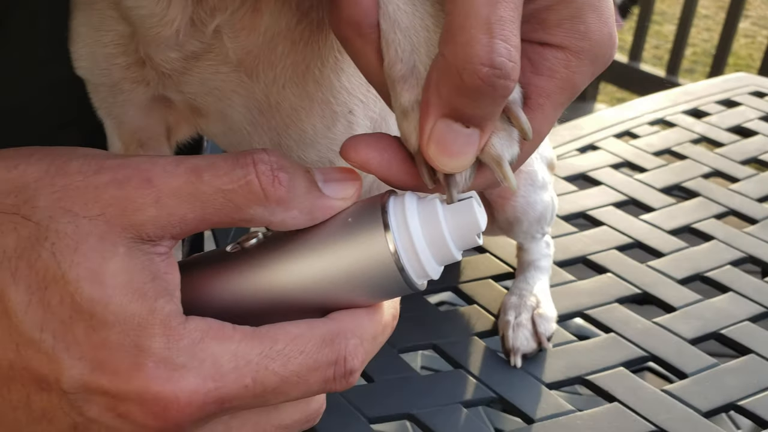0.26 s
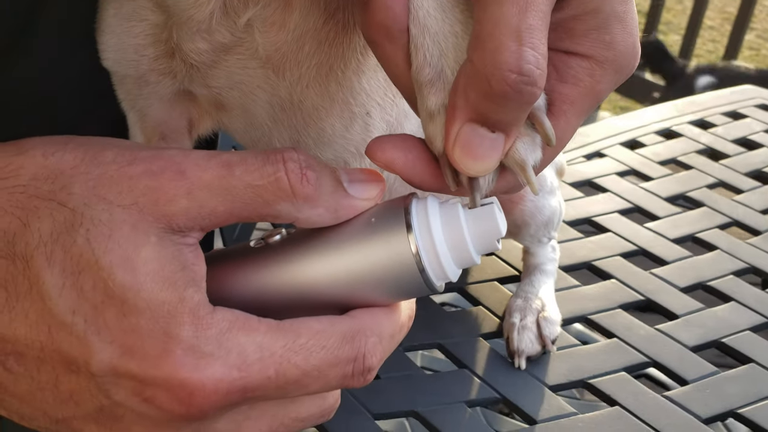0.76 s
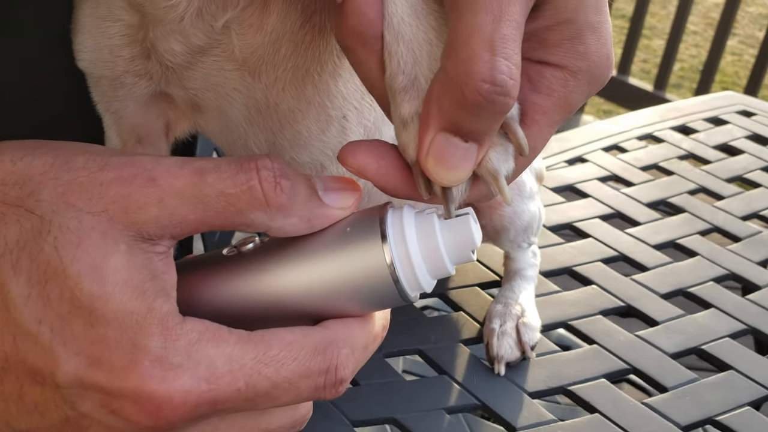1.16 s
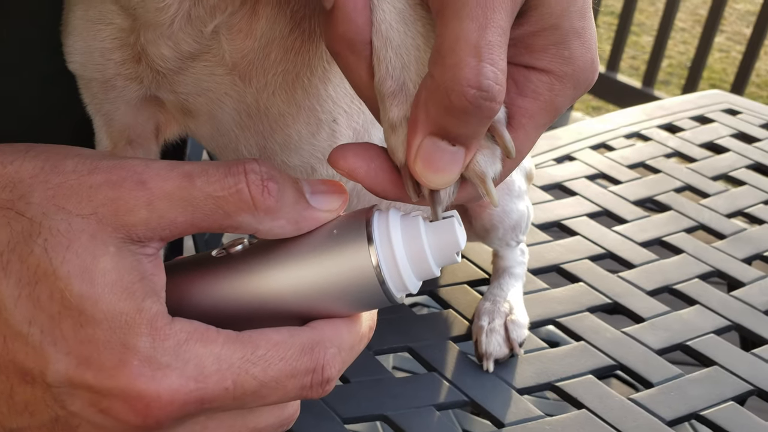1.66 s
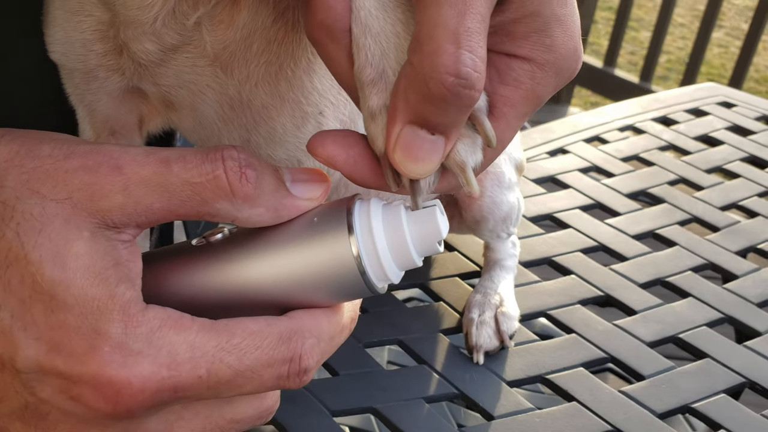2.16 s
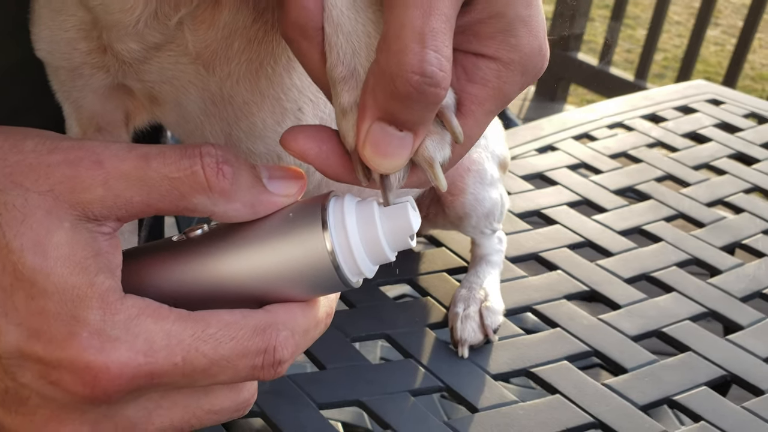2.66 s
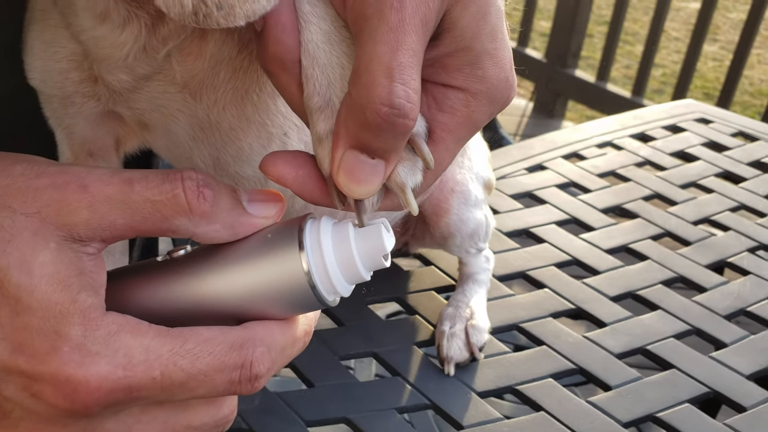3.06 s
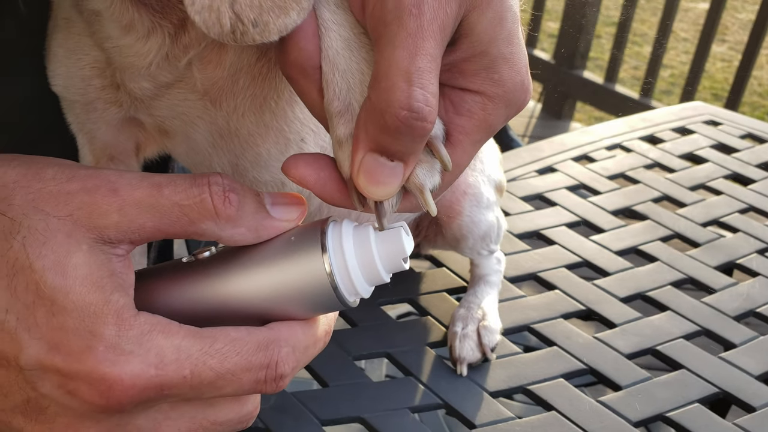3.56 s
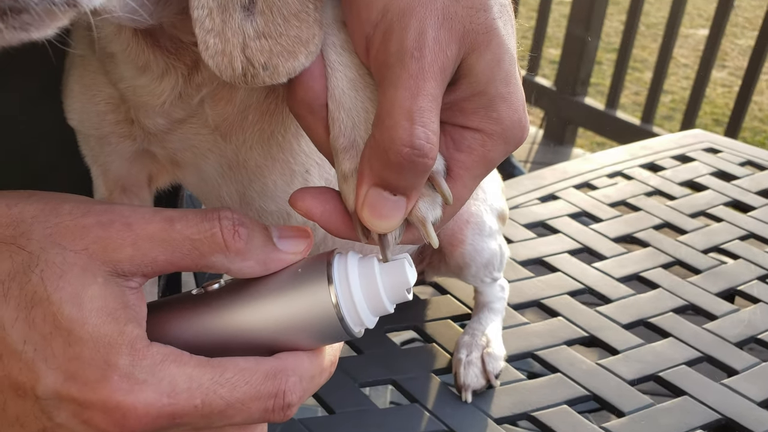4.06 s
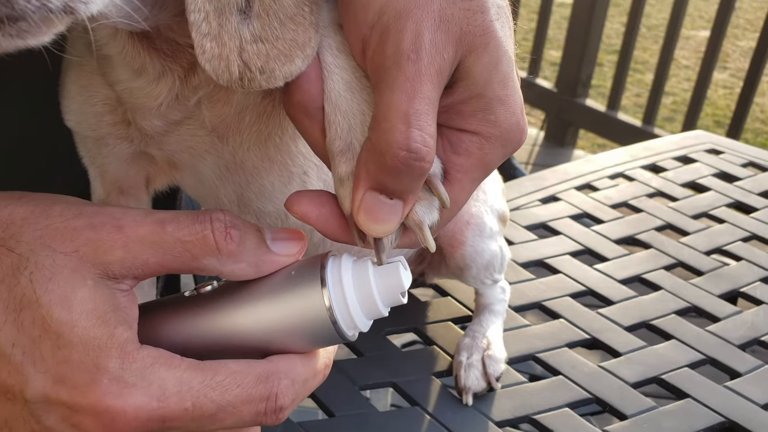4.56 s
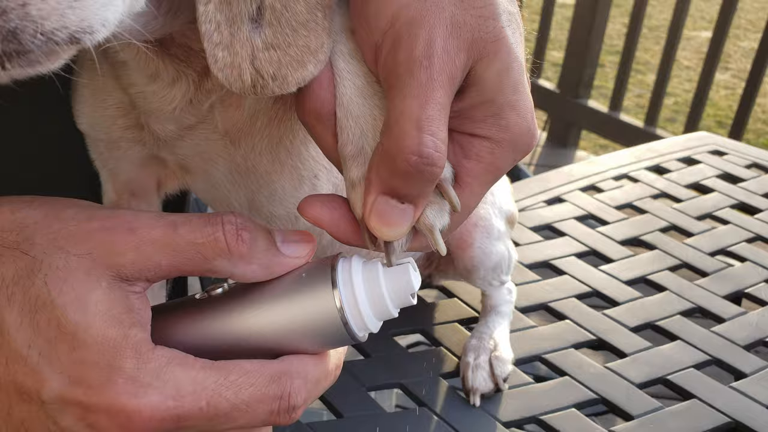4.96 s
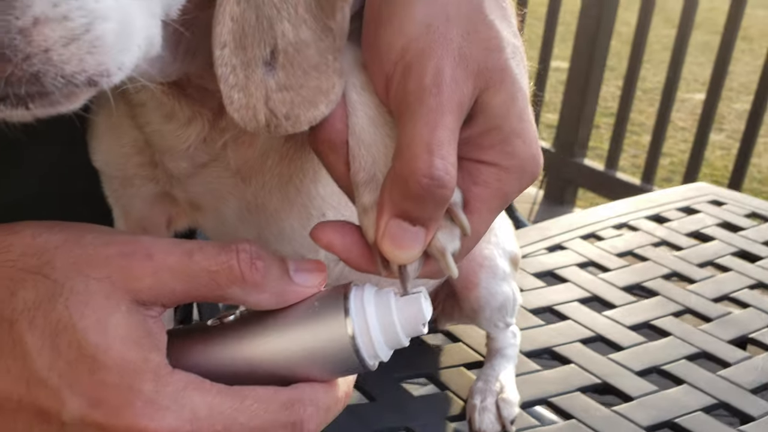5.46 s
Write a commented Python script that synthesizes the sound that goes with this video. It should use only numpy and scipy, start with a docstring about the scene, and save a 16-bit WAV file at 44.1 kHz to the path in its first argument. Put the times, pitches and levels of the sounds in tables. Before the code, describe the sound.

A small electric nail grinder buzzes and rasps in gritty hissing spells, its motor sagging under pressure and revving up when eased, on a quiet patio.

```python
"""A steady, rasping hiss opens over a low motor buzz: a small nail grinder files a dog's toenail on a patio.
Pressed on, the nail loads the motor and slows it; eased off, the motor runs up and the bit strikes
once a turn. Grit noise, shaft orders and housing resonances make the tool, all tied to one rotation.
Sharp snags, dull handling bumps, a low rumble of air and a far hum that fades accompany it."""
import sys
import numpy as np
from scipy import signal
from scipy.fft import rfft, irfft
from scipy.io import wavfile
from scipy.ndimage import uniform_filter1d

SR = 44100
rng = np.random.default_rng(int(sys.argv[2]) if len(sys.argv) > 2 else 0)


def unload_audio(sound):
    """Save the sound as a 16-bit wav file, at the path given as the first command line argument."""
    columns = np.transpose(np.atleast_2d(sound))
    # keep every value between -1 and 1, then stretch to whole-number steps
    steps = np.round(np.clip(columns, -1, 1) * 32767)
    wavfile.write(sys.argv[1], SR, steps.astype(np.int16))


N = 251370
TIME, FREQS = np.arange(N) / SR, np.fft.rfftfreq(N, 1 / SR)  # s, Hz

# The nail is pressed on. Each row: start in seconds, speed approached in turns per second, settling time
# in seconds, rasp in dB at the reference speed before load and contact act, coarse scrape and fine fizz
# in dB against the rasp (fizz before bouncing weakens it), housing knock in dB at full contact.
PRESS_STROKES = [(0, 32.03, .1, -33, -7.5, 3, -63), (.3, 27, .1, -33.5, -10, 0.5, -61),
                 (1.11, 39.8, .18, -30.5, -9.5, 0, -53), (1.94, 23.6, .337, -31, -8, -.5, -51),
                 (2.87, 36.27, .158, -30.5, -9.5, -2.5, -61), (3.635, 38.29, .135, -30.5, -13.5, -1.5, -51),
                 (4.129, 32.08, .196, -34.5, -9, 1, -57.5), (4.517, 28.83, .148, -33.5, -7.5, 0.5, -58),
                 (4.746, 29.37, .151, -31, -11, 0.5, -52)]
# Buzz of the lightly loaded shaft. Each row: time in seconds, level in dB.
BUZZ_LEVEL = [(0, -40.5), (5.41, -44), (5.49, -37.5), (5.53, -64)]
# Colour of the motor's whirr. Each row: frequency in Hz, gain in dB.
WHIRR_COLOUR = [(500, -29.5), (1150, -3), (1550, -4), (2300, -8), (7500, -9.5), (9000, -29), (13000, -1),
                (15500, -11)]


def gain_of(db):
    """Logarithmic level: decibels become an amplitude ratio."""
    return 10 ** (np.asarray(db) / 20)


def evened(x):
    """Power normalisation: scales to rms 1, a pair by the mean of its two channels."""
    middle = np.atleast_2d(x).mean(0)
    return x / np.sqrt(np.mean(middle ** 2) + 1e-20)


def curve(rows):
    """Linear interpolation in time of (s, value) rows."""
    return np.interp(TIME, *np.transpose(rows))


def read(points):
    """Interpolation of (Hz, value) rows on a logarithmic frequency axis."""
    hz, value = np.transpose(points)
    return np.interp(np.log(FREQS + 1), np.log(hz + 1), value)


def colour(x, db):
    """Minimum-phase filtering: folding the cepstrum makes the given gain causal."""
    cepstrum = irfft(np.maximum(db, -100) * np.log(10) / 20, N)
    cepstrum[1:N // 2] *= 2
    cepstrum[N // 2 + 1:] = 0
    return irfft(rfft(x) * np.exp(rfft(cepstrum)), N)


def wander(hz):
    """Low-passed noise: a slow random variation of rms 1, up to about the given rate."""
    return evened(irfft(rfft(rng.standard_normal(N)) / (1 + (FREQS / hz) ** 4), N))


def at_microphones(pair, db):
    """Partial coherence: two unrelated drives become a partly alike pair, the right shaded and later."""
    # Each row: frequency in Hz, gain of the right microphone in dB against the left.
    shade = [(700, -13.5), (1150, -5.5), (1650, -19), (2300, -8.5), (3600, -1.5), (4400, -3.5), (5400, -3),
             (6900, -22), (7800, -23.5), (8700, 1), (9600, -2), (11800, 3.5), (13000, -6.5), (15500, -4)]
    # Each row: frequency in Hz, left-right likeness from -1 to 1.
    likeness = [(700, 0.074), (1400, 1), (3300, 0.42), (5800, 0.34), (7000, 0.55), (7600, 0.61),
                (9500, -0.49), (11600, 0.15), (13000, -0.36)]
    lag_samples = 8
    same = np.clip(read(likeness), -1, 1)
    left, other = rfft(pair)
    mixed = same * left + np.sqrt(1 - same ** 2) * other
    right = irfft(mixed * np.exp(-2j * np.pi * FREQS * lag_samples / SR), N)
    return np.array([colour(pair[0], db), colour(right, db + read(shade))])


def moves():
    """Alternating load: presses and easings in time order (s, goal speed, settling s, four levels)."""
    # The nail is eased off. Each row: start in seconds, speed approached in turns per second,
    # then rasp, scrape, fizz and knock in dB as for the presses.
    ease_strokes = [(.595, 88, -33, -8.5, 2, -50), (1.569, 105.5, -34.5, -7, 0.5, -50),
                    (2.466, 112, -34, -4.5, 1, -55), (3.271, 120, -34.5, -8.5, -0.5, -51.5),
                    (3.929, 135.5, -34.5, -9, 1.5, -58), (4.404, 151.7, -33.5, -7, 1.5, -51),
                    (4.664, 149, -36.5, -6.5, 1.5, -51), (5.264, 146, -31, -9, -2, -50.5)]
    ease_s = 0.145  # the speed's recovery time
    easings = [(s, goal, ease_s, *levels) for s, goal, *levels in ease_strokes]
    return sorted([tuple(row) for row in PRESS_STROKES] + easings)


def stroke_speed(shape=1.45):
    """Rotor relaxation: the speed tends to each move's goal; a shape over 1 softens the start."""
    speed = np.full(N, float(PRESS_STROKES[0][1]))
    for start, goal, settle_s, *_ in moves():
        at = max(round(start * SR), 0)
        remaining = np.exp(-(TIME[:N - at] / settle_s) ** shape)
        speed[at:] = goal + (speed[at] - goal) * remaining
    return speed


def stroke_levels(grip_s=0.15):
    """Moving average: rasp, scrape, fizz and knock dB hold through each move and blend between."""
    held = np.zeros((N, 4)) + PRESS_STROKES[0][3:]
    for start, _, _, *levels in moves():
        held[max(round(start * SR), 0):] = levels
    return uniform_filter1d(held.T, size=round(grip_s * SR), axis=1, mode="nearest")


def contact_db():
    """Contact loss: the level falls as the nail lifts and returns quickly as it lands."""
    # Each row: time off the bit in seconds, time fully back on in seconds, depth limit in dB.
    lift_times = [(2.736, 2.894, 21), (3.368, 3.442, 22), (3.423, 3.494, 15), (4.027, 4.116, 10.5),
                  (4.445, 4.512, 24), (4.691, 4.742, 20)]
    lift_db_per_s, land_s = 318, 0.0095
    let_go_s, let_go_db_per_s = 5.347, 700  # the nail is taken away
    lost = np.maximum(TIME - let_go_s, 0) * let_go_db_per_s
    for off, on, depth_db in lift_times:
        fall = np.clip((TIME - off) * lift_db_per_s, 0, depth_db)
        lost += fall * np.clip((on - TIME) / land_s, 0, 1)
    return -lost


def shaft(jitter=0.004, free_speed=166, spin_up_s=0.047):
    """First-order motor law: the load is what holds the rotor below its free speed in turns per s."""
    speed = stroke_speed()
    acceleration = np.gradient(speed) * SR
    load = 1 - (speed + spin_up_s * acceleration) / free_speed
    turns = np.cumsum(speed * (1 + jitter * wander(37.8))) / SR
    return speed, turns, np.clip(uniform_filter1d(load, size=900), 0, 1)


def touch(turns, sharpness):
    """Eccentric contact: the off-centre bit presses hardest once a turn, with mean power 1."""
    return np.exp(sharpness * np.cos(2 * np.pi * turns)) / np.sqrt(np.i0(2 * sharpness))


def surface(speed, turns, count, uneven_db=3.0):
    """Periodic roughness: a random profile repeats every turn, a comb of strong and weak shaft orders."""
    orders = np.exp(2j * np.pi * rng.random((2, count))) * (np.arange(count) > 0)
    clusters = evened(uniform_filter1d(rng.standard_normal(count), size=2))
    order_gains = gain_of(uneven_db * np.clip(clusters, -2, 2))
    profile = irfft(orders * order_gains, count * 32)
    angle = np.arange(profile.shape[1]) / profile.shape[1]
    traced = np.array([np.interp(turns % 1, angle, p) for p in profile])
    return evened(traced * np.sqrt(speed))


def grit(grains_per_s=6000, spread_db=3.0, smooth=2.0):
    """Shot noise: single abrasive grains of uneven size over a smooth hiss."""
    grain = rng.random(N) < grains_per_s / SR
    size = gain_of(spread_db * np.minimum(rng.exponential(1, N), 5)) * grain
    return evened(rng.standard_normal((2, N)) * np.hypot(evened(size), smooth))


def body_db():
    """Modal resonance: gain of nail, bit and guard, with peaks and a falling bass."""
    # Colour of nail, bit and plastic guard. Each row: frequency in Hz, gain in dB.
    broad = [(700, -23.5), (1050, -25.5), (1400, -20.5), (2500, -9.5), (4300, -13.5), (5800, 3),
             (6900, 5.5), (8400, -9), (9800, -14.5), (13500, -8.5), (15700, -15)]
    # Their resonances. Each row: frequency in Hz, width in Hz, height in dB.
    resonances = [(1614, 210, 14.7), (3252, 780, 10.5), (3750, 192, 11.5), (5270, 650, 8.1),
                  (7475, 1830, 16.76), (7576, 240, 10.3), (11430, 570, 4.6)]
    peaks = sum(db / (1 + (2 * (FREQS - hz) / width) ** 2) for hz, width, db in resonances)
    return read(broad) + peaks + read([(100, -14.5), (500, -13.5)])


def shifting(x, patchy_db=2.0):
    """Time-varying filtering: the contact creeps along the nail, so peaks of colour come and go."""
    z = signal.stft(x, nperseg=512)[2]
    field = rng.standard_normal(z.shape[1:])
    for _ in range(2):
        field = uniform_filter1d(field, size=3, axis=0)  # across frequency
        field = uniform_filter1d(field, size=30, axis=1)  # along time
    patches = gain_of(patchy_db * field / field.std())
    return signal.istft(z * patches, nperseg=512)[1][:, :N]


def grinding(speed, turns, load, tremor_db=0.59, bounce_load=0.45, bounce_sharpness=0.9):
    """Abrasive friction: grit scrapes in bursts under light load and rasps steadily under heavy load."""
    work_speed, rasp_db_per_octave = 60, 4  # reference turns per s; growth per doubling of speed
    rasp_bounce_db, fizz_bounce_db = -2.35, -5.5  # weaker when the bit only bounces
    bouncing = 1 / (1 + np.exp((load - bounce_load) / 0.029))  # 1 under light load, 0 under heavy
    sharpness = 0.1 + bounce_sharpness * bouncing
    rasp_db, scrape_db, fizz_db, _ = stroke_levels()
    level_db = rasp_db + rasp_db_per_octave * np.log2(speed / work_speed)
    level_db += rasp_bounce_db * bouncing + contact_db()
    press = touch(turns, sharpness) * gain_of(level_db + tremor_db * wander(17.7))
    # a lightly touching bit meets the nail with the same grains at every turn
    repeating = .22 + .45 * bouncing
    drive = np.sqrt(1 - repeating) * grit() + np.sqrt(repeating) * surface(speed, turns, count=180)
    sound = rfft(shifting(at_microphones(drive, body_db())))
    below = 1 / (1 + (FREQS / 4300) ** 20)
    above = 1 - 1 / (1 + (FREQS / 9000) ** 20)
    scrape, rasp, fizz = (evened(irfft(sound * band, N)) for band in (below, 1 - below - above, above))
    fizz_gain = gain_of(fizz_db + fizz_bounce_db * bouncing)
    return press * (scrape * gain_of(scrape_db) + rasp + fizz * fizz_gain)


def knocking(speed, turns, order_focus=22, order_width=4, focus=4.2):
    """Forced resonance: the bit's ridges knock each turn, their orders sweeping through the housing's peak."""
    lift_share = 0.47  # the housing keeps part of its buzz while the nail is off
    orders = np.arange(1, 48)
    # the orders near the count of ridges stand out
    weights = 1 + focus * np.exp(-((orders - order_focus) / order_width) ** 2)
    ridges = sum(w * np.cos(2 * np.pi * (k * turns + rng.random())) for k, w in zip(orders, weights))
    drive = (evened(ridges * np.sqrt(speed)) + .45 * grit()) * touch(turns, 1.3)
    housing = read([(600, -59), (1050, -11.0), (1300, 8.5), (1620, 16.5), (2200, 9.0), (2700, 9.0),
                    (4000, -58.0)])
    *_, knock_db = stroke_levels()
    level_db = knock_db + lift_share * contact_db()
    return gain_of(level_db) * evened(at_microphones(drive, housing))


def motor(speed, turns, rattle_hiss=0.85, brush_hiss=0.7, sharpness=0.2):
    """Amplitude modulation by rotation: shaft rattle swells once a turn, brush whirr twice."""
    # Colour of the shaft's buzz. Each row: frequency in Hz, gain in dB.
    buzz_colour = [(300, -20.5), (700, -46), (1500, -1.5), (2000, -21), (3900, -38.5), (5200, -11),
                   (6400, 3.5), (7700, 0), (8900, -15.5), (15500, -2)]
    whirr_db = -56
    rattle = (surface(speed, turns, count=150) + rattle_hiss * grit()) * touch(turns, sharpness)
    brushes = (surface(speed, turns, count=120) + brush_hiss * grit()) * touch(2 * turns, 0.33)
    buzz = evened(at_microphones(rattle, read(buzz_colour))) * gain_of(curve(BUZZ_LEVEL))
    whirr = evened(at_microphones(brushes, read(WHIRR_COLOUR))) * gain_of(whirr_db)
    return buzz + whirr


def whine(turns, first_order=11):
    """Harmonic orders: clean tones glide with the speed and carry once they rise past 1 kHz."""
    # One level per successive shaft order, in dB against the buzz level before the whirr's colour.
    order_db = [-10, -21, -20.5, -25, -16]
    tones = sum(gain_of(db) * np.cos(2 * np.pi * (k * turns + rng.random()))
                for k, db in enumerate(order_db, first_order))
    pair = np.array([tones, np.zeros(N)])
    return at_microphones(pair, read(WHIRR_COLOUR)) * gain_of(curve(BUZZ_LEVEL))


def outdoors(apart=0.35):
    """Superposition of a broadband field and distant tones: rumbling air and a hum that fades."""
    # Colour of the outdoor air. Each row: frequency in Hz, gain in dB.
    air_colour = [(25, -20.5), (60, 12.5), (100, 4), (300, -11), (600, -17), (6000, -21)]
    # Each row: time in seconds, air level in dB before the balance of the two sides.
    air_level = [(0, -55.5), (2, -55.5), (3.2, -58.5), (5.2, -56.5), (5.52, -49.5), (5.7, -56)]
    # Each row: frequency in Hz, level in dB before fade and balance, lag of the right side in radians.
    hum_tones = [(102.3, -77.5, 0.58), (197.3, -67.5, 1.66), (298.5, -65, 2.86), (390.6, -72.5, 1.66)]
    # Each row: time in seconds, gain of the hum in dB.
    hum_level = [(0, 7), (1, 1.5), (2.3, 0), (4, -31)]
    noise = rng.standard_normal(N) + apart * rng.standard_normal((2, N))
    air = evened(colour(noise, read(air_colour))) * gain_of(curve(air_level) + 0.24 * wander(24))
    clock = TIME + 0.00027 * wander(6.5)  # the pitch wavers slightly
    hum = sum(gain_of(db) * np.sqrt(2) * np.sin(2 * np.pi * hz * clock - np.array([[0], [lag]]))
              for hz, db, lag in hum_tones)
    return (air + hum * gain_of(curve(hum_level))) * gain_of([[1.6], [-2]])


def snags(rise_s=0.00077, level_db=-4):
    """Impulsive excitation: brief hard bites of the bit on the nail, within presses and around lift-offs."""
    # Each row: start in seconds, peak of the bite's envelope in dB before the common level_db.
    bite_times = [(.305, -26), (.343, -23), (.388, -25.5), (2.25, -17), (2.3596, -13.5), (2.8969, -9.5),
                  (2.905, -13), (2.916, -16), (3.3728, -18.5), (3.441, -17), (3.505, -18.5), (3.9951, -13),
                  (4.0094, -19), (4.693, -32), (5.3392, -34)]
    bite = np.zeros(N)
    for s, db in bite_times:
        age = np.maximum(TIME - s, 0) / rise_s
        bite += gain_of(db + level_db) * age * np.exp(1 - age)
    return bite * evened(at_microphones(grit(), body_db()))


def bumps(rise_s=0.014, width_hz=30, level_db=-3):
    """Damped resonance: hands and paws bump softly, each a short thud of narrow-band noise."""
    # Each row: start in seconds, envelope peak in dB before level_db and side balance, frequency in Hz.
    thud_times = [(0.41, -55, 232), (1.158, -48.5, 202), (2.301, -48.5, 245.5), (2.524, -45, 152.9),
                  (3.32, -51, 302.3), (3.999, -41, 196.7), (4.291, -53, 237.6), (4.598, -49, 187),
                  (5.042, -46.5, 171.6), (5.266, -53, 131.8), (5.503, -53.5, 191)]
    out = np.zeros(N)
    for s, db, hz in thud_times:
        age = np.maximum(TIME - s, 0) / rise_s
        resonance = 1 / np.hypot(1, (FREQS - hz) / width_hz) / (1 + (FREQS / 700) ** 4)
        thud = irfft(rfft(rng.standard_normal(N)) * resonance, N)
        out += gain_of(db + level_db) * age * np.exp(1 - age) * evened(thud)
    return out * gain_of([[1.5], [-2]])


def scene():
    """Superposition: every tool sound shares one rotation, over the quiet patio."""
    speed, turns, load = shaft()
    tool = grinding(speed, turns, load) + knocking(speed, turns)
    tool = tool + motor(speed, turns) + whine(turns) + snags()
    return tool + outdoors() + bumps()


def record(dry, edge_hz=15900):
    """Band limitation: a linear-phase low-pass removes the highest treble."""
    low_pass = signal.firwin(511, edge_hz, window=("kaiser", 9), fs=SR)
    return signal.oaconvolve(dry, low_pass[None], "same")


dry = scene()
out = record(dry)
unload_audio(out)
```